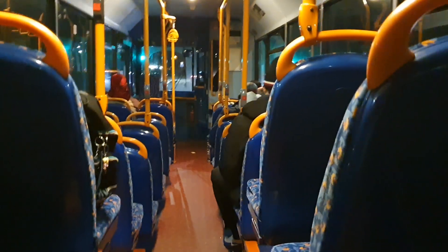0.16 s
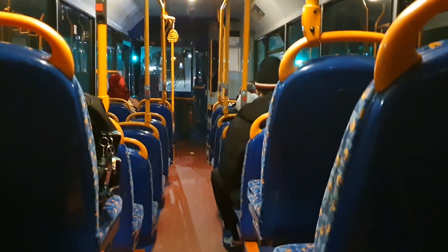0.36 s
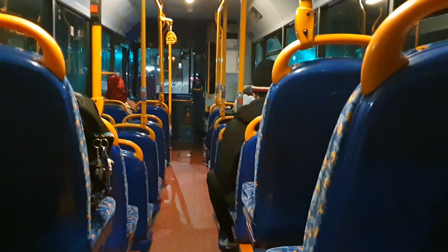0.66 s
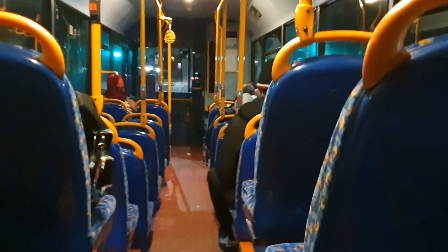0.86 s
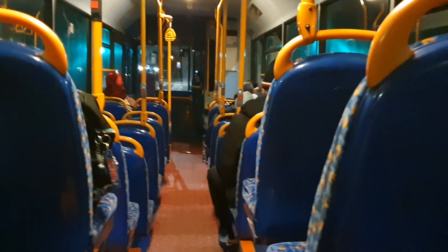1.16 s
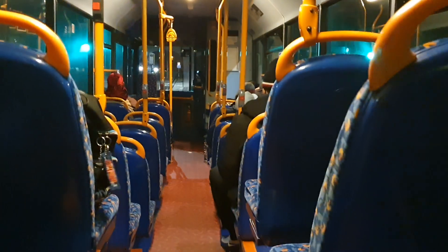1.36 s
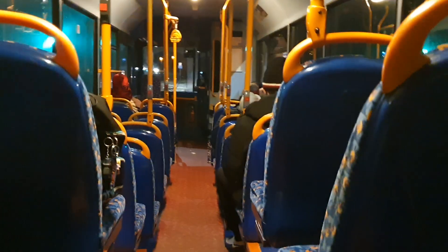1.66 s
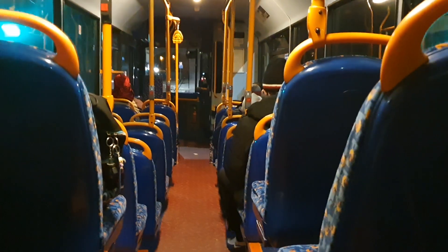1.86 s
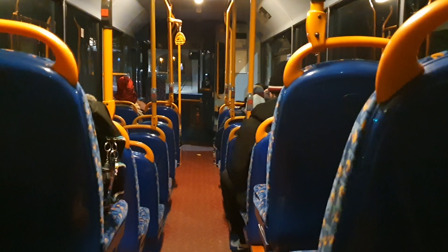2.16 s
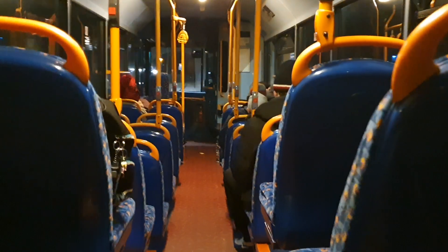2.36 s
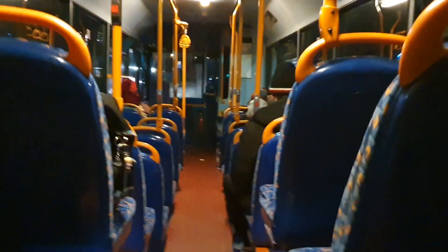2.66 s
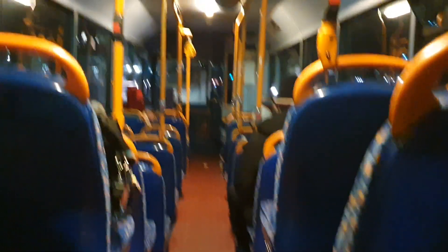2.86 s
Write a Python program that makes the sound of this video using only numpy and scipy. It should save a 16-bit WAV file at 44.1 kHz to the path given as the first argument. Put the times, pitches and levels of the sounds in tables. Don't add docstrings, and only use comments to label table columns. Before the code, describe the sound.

A bus engine drones steadily with road rumble, heard from a passenger seat; jolts bring booming knocks and panel rattles early on, a calmer middle, then more knocks and sharp window snaps.

```python
import sys
import numpy as np
from scipy import signal
from scipy.fft import rfft, irfft
from scipy.io import wavfile
from scipy.ndimage import uniform_filter1d

SR = 44100
rng = np.random.default_rng(int(sys.argv[2]) if len(sys.argv) > 2 else 0)


def materialize(psi):
    bounded = np.clip(np.atleast_2d(psi).T, -1, 1)
    quanta = np.round(bounded * 32767).astype(np.int16)
    wavfile.write(sys.argv[1], SR, quanta)


def gain_from_db(level_db):
    decades = np.asarray(level_db, float) / 20
    return 10 ** decades


N = 132300
SILENCE = 1e-18


def rms_one(x):
    return x / np.sqrt(np.mean(x ** 2) + 1e-20)


def in_time(rows):
    s, *columns = np.transpose(rows)
    return [np.interp(np.arange(N) / SR, s, c) for c in columns]


def at_hz(points, n):
    hz, value = np.transpose(points)
    grid_hz = np.arange(n // 2 + 1) * SR / n
    return np.interp(np.log(grid_hz + 1), np.log(hz + 1), value)


def colour(x, points):
    n = x.shape[-1]
    return irfft(rfft(x) * rms_one(gain_from_db(at_hz(points, n))), n)


def drift(rate_hz):
    r = np.exp(-2 * np.pi * rate_hz * 40 / SR)
    noise = rng.standard_normal(N // 40 + 2002)
    slow = signal.lfilter([1], [1, -2 * r, r * r], noise)[2000:]
    return np.interp(np.arange(N) / 40, np.arange(len(slow)), rms_one(slow))


def resonate(x, hz, width_hz):
    r = np.exp(-np.pi * width_hz / SR)
    feedback = [1, -2 * r * np.cos(2 * np.pi * hz / SR), r * r]
    return signal.lfilter(np.array([1, 0, -1]) * (1 - r * r) / 2, feedback, x)


# pitch_hz, likeness_0_to_1
LIKENESS = [(40, 0.92), (130, 0.91), (300, 0.84), (700, 0.73), (2500, 0.03)]


def pair(n):
    mid, side = rfft(rng.standard_normal((2, n)))
    alike = np.clip(at_hz(LIKENESS, n), 0, 1)
    shared = np.sqrt((1 + alike) / 2) * mid
    opposed = np.sqrt((1 - alike) / 2) * side * [[1], [-1]]
    return irfft(shared + opposed, n)


def cabin(x, t60_s, wet_db):
    tail = pair(8192) * gain_from_db(-60 * np.arange(8192) / SR / t60_s)
    tail = gain_from_db(wet_db) * tail / np.sqrt(np.sum(tail ** 2) / 2)
    return x + signal.fftconvolve(x[None], tail, axes=1)[:, :N]


def struck(n, power, length_s, t60_s, attack_s):
    rise = np.exp(-1 / (attack_s * SR))
    fast, slow = np.exp(-2 / (length_s * SR)), gain_from_db(-120 / (t60_s * SR))
    power = signal.lfilter([1 - rise], [1, -rise], power)
    chatter = signal.lfilter([1], [1, -fast], power)
    tail = gain_from_db(2 * -6) * signal.lfilter([1], [1, -slow], power)
    return pair(n) * np.sqrt(chatter + tail)


# time_s, rate_hz
FIRING_RATE = [(0, 45.19), (1.2, 46.29), (2.05, 46.36), (2.4, 48.75), (3, 46.6)]


def firing():
    hz, = in_time(FIRING_RATE)
    wobble = 1 + 0.01004 * drift(4.5)
    return 2 * np.pi * np.cumsum(hz * wobble) / SR


# time_s, level_db
ENGINE_LEVEL = [(0, -19), (.3, -22.5), (.45, -19.5), (.7, -22), (.85, -19), (1.2, -24.5), (1.45, -20.5),
                (2.05, -22), (2.33, -12.5), (2.45, -19.5), (2.65, -24), (2.8, -16), (3, -36)]
# multiple, level_db
FIRING_ORDERS = [(2, -17.5), (3, -22), (4, -20), (5, -20)]


def engine(turn):
    db, = in_time(ENGINE_LEVEL)
    out = gain_from_db(db + 2 * drift(4.0)) * np.sin(turn)
    for multiple, order_db in FIRING_ORDERS:
        level = gain_from_db(np.mean(db) + order_db + 1.6 * drift(17.0))
        out = out + level * np.sin(round(multiple) * turn + rng.uniform(0, 6.16))
    return np.sqrt(2) * out


# centre_s, level_db
LOW_SURGES = [(0.008, -15.5), (0.435, -15.5), (0.491, -13), (0.532, -17), (0.583, -10.5), (0.645, -11),
              (0.77, -21), (0.844, -19.5), (0.886, -13), (0.952, -13.5), (0.992, -17.7), (1.057, -19),
              (1.106, -14.5), (1.148, -20), (1.179, -12.5), (1.218, -15.6), (1.312, -19.5), (1.545, -22),
              (1.607, -16.5), (2.102, -15.5), (2.292, -23), (2.351, -16.8), (2.412, -18), (2.456, -30),
              (2.521, -19), (2.552, -23), (2.643, -12.5), (2.73, -12.7), (2.794, -12), (2.863, -20.5),
              (2.91, -17), (2.981, -14)]


def surges(turn):
    surge_hz, spread_s, gain_db = 69.6, 0.01, -1
    t, out = np.arange(N) / SR, np.zeros(N)
    for s, db in LOW_SURGES:
        swell = np.exp(-((t - s) / spread_s) ** 2 / 2)
        out += gain_from_db(db + gain_db) * swell * np.sin(turn[int(s * SR)] + 2 * np.pi * surge_hz * (t - s))
    return out


# pitch_hz, width_hz, level_db
BODY_BOOMS = [(30.6, 10.6, -2), (44.5, 6.1, -3), (66.46, 6.7, 3.5), (76.2, 16.3, 0.5)]


def booms(load_db):
    rings = []
    for hz, width_hz, db in BODY_BOOMS:
        ring = resonate(resonate(pair(N), hz, width_hz), hz, width_hz)
        rings.append(gain_from_db(db) * rms_one(ring))
    x = rms_one(sum(rings))
    local_power = uniform_filter1d(np.mean(x ** 2, 0), size=4000)
    return gain_from_db(load_db + 0.5) * x / np.sqrt(0.045 + local_power)


# start_s, peak_db, favoured_pitch_hz, seat_frame_brightness_db
KNOCK_EVENTS = [(.274, -16.5, 275, -10.5), (.494, -15, 164, -23), (0.543, -18, 170, -29),
                (.619, -10.5, 165, -26), (.745, -12, 298, -18), (.808, -14.5, 298, -19),
                (0.863, -7, 162, -17), (.878, -10.5, 412, -5), (.908, -12, 238, -16),
                (.945, -19.5, 180, -0.5), (.971, -18, 296, -16), (.993, -13, 220, -15),
                (1.046, -17, 195, -8), (1.077, -17, 350, -23), (1.105, -18.5, 166.4, -14),
                (1.185, -15.5, 168, -23), (1.256, -16, 248, -15), (2.067, -12.5, 232, -12.5),
                (2.146, -6, 307, -8.5), (2.448, -18, 300, 1), (2.485, -7.5, 306, -10),
                (2.553, -14.5, 332, -19), (2.616, -19, 200, -13), (2.686, -14, 189, -5.5),
                (2.716, -13.5, 317, -11), (2.759, -19, 227, -4), (2.886, -13, 277, -16),
                (2.971, -16.5, 310, -21)]
# pitch_hz, level_db, t60_s
FLOOR_MODES = [(164.8, -4.5, 0.13), (201.4, -3, 0.12), (275, -4.5, 0.12), (321, 0, 0.072),
               (375, -5.5, 0.14), (459, -9, 0.089)]


def knocks():
    s, db, pitch_hz, bright_db = np.transpose(KNOCK_EVENTS)
    at = ((s + 0.0019) * SR).astype(int)
    luck_db = rng.normal(0, 1.5, (len(s), len(FLOOR_MODES)))
    floor = 0
    for k, (hz, mode_db, t60_s) in enumerate(FLOOR_MODES):
        off_pitch_db = 9 * np.abs(np.log2(hz / pitch_hz))
        clicks = np.full(N, SILENCE)
        clicks[at] = gain_from_db(db - 3 + mode_db + luck_db[:, k] - off_pitch_db)
        r, w = gain_from_db(-60 / (t60_s * SR)), 2 * np.pi * hz / SR
        floor = floor + signal.lfilter([0, np.sin(w)], [1, -2 * r * np.cos(w), r * r], clicks)
    floor = signal.lfilter([0.13], [1, -0.87], floor)

    frame_hz, frame_width_hz = 764, 455
    power = np.full(N, SILENCE)
    power[at] = gain_from_db(2 * (db + bright_db + 9.5))
    frames = struck(N, power, length_s=0.015, t60_s=0.066, attack_s=0.0013)
    frames = resonate(resonate(frames, frame_hz, frame_width_hz), frame_hz, 2 * frame_width_hz)
    return frames + cabin(floor, t60_s=0.34, wet_db=-9)


# start_s, peak_db, pitch_hz
CLATTER_EVENTS = [(0.153, -24, 2310), (0.527, -28.5, 3220), (0.545, -18.5, 1970), (0.619, -23, 3500),
                  (0.7126, -28.5, 2700), (0.792, -21.5, 1570), (0.881, -16.5, 1700), (0.955, -17, 1890),
                  (1.017, -29, 2500), (1.1746, -24.5, 2090), (1.3867, -29, 2300), (1.5843, -28.5, 2400),
                  (1.659, -28.5, 3900), (2.027, -31.5, 2630), (2.045, -31, 2980), (2.091, -22, 1590),
                  (2.122, -27.5, 2670), (2.172, -29, 2670), (2.2256, -28.5, 2480), (2.2994, -25.5, 2480),
                  (2.4421, -22.5, 2700), (2.518, -20.5, 1570), (2.59, -31, 2690), (2.674, -20, 1540),
                  (2.752, -13, 1450), (2.807, -21.5, 1710), (2.896, -24, 2900), (2.9347, -26, 3140)]


def clatters():
    q, ping_hz, n = 1.8, 2850, 8192
    out = np.zeros((2, N + n))
    for s, db, hz in CLATTER_EVENTS:
        impulse = 1.0 * (np.arange(n) == 0)
        hit = struck(n, impulse, length_s=0.0052, t60_s=0.24, attack_s=0.0067)
        body = resonate(resonate(hit, hz, hz / q), hz, 2 * hz / q)
        wide = gain_from_db(-1) * resonate(hit, 2400, 2100)
        ping = gain_from_db(9) * (abs(hz - ping_hz) < 400) * resonate(hit, ping_hz, 140)
        out[:, int(s * SR):][:, :n] += gain_from_db(db - 10) * (4 * body + wide + ping)
    return out[:, :N]


# pitch_hz, density_db_per_hz
RATTLE_COLOUR = [(80, -42), (150, -0.5), (300, -10), (600, -16.5), (910, -13), (1300, -22.5), (4200, -26),
                 (16000, -44)]


def rattle(shake_db):
    contacts_per_s, spread_db = 400, 2
    power = gain_from_db(2 * spread_db * np.minimum(rng.exponential(1, N), 5))
    born = rng.random(N) < contacts_per_s * gain_from_db(2 * drift(14.0)) / SR
    hits = struck(N, power * born + SILENCE, length_s=0.0014, t60_s=0.096, attack_s=0.0017)
    return gain_from_db(shake_db + 10.5) * rms_one(colour(hits, RATTLE_COLOUR))


def jingle(shake_db):
    born = rng.random(N) < 900 / SR
    power = born * rng.exponential(1, N) ** 2 + SILENCE
    x = struck(N, power, length_s=0.0018, t60_s=0.19, attack_s=0.0005)
    x = signal.sosfilt(signal.butter(2, 5070, "high", fs=SR, output="sos"), x)
    return gain_from_db(-50 + 8 + 1.73 * (shake_db + 39.5)) * rms_one(x)


# start_s, peak_db, dull_body_db
WINDOW_TICKS = [(0.0159, -46, -2), (0.0857, -42, -2), (0.1575, -39, -1), (0.217, -38.5, -7),
                (0.2902, -45, -3), (0.3491, -45, -1), (0.426, -36.5, -1), (0.5292, -41.5, 13),
                (0.6125, -37, 9.5), (0.7138, -37.5, 9.5), (0.794, -36, 8.5), (0.8764, -34.5, 6),
                (0.9308, -31, -11), (1.0809, -41, -15), (1.1228, -37, -5), (1.2052, -45, -13),
                (1.281, -43, -3), (1.3504, -45.5, 2), (1.4032, -48, -7), (1.4147, -49, 0),
                (1.4819, -43, -0.5), (1.5489, -49, -1), (1.6147, -51, 10), (1.7025, -48, -4),
                (1.7619, -54, -10), (1.8128, -60, 10), (1.9175, -53, 13), (2.0258, -50, -1),
                (2.0433, -39, -1), (2.0956, -53, -3), (2.1221, -48, 9), (2.1485, -34, -4),
                (2.2353, -41.5, -9), (2.3062, -37.5, -17), (2.3645, -45, -6), (2.4423, -33.5, 4),
                (2.4877, -32, -13), (2.5546, -37, -13), (2.5765, -35, -5), (2.6484, -36, -4),
                (2.6738, -35, -4), (2.7362, -37, -8), (2.855, -36, -6), (2.917, -52, 1), (2.9831, -38, -9)]
# pitch_hz, density_db_per_hz
GLASS_COLOUR = [(5000, -14), (8000, -1), (10500, -1.5), (13500, 6.5), (16000, 4)]


def window():
    s, db, body_db = np.transpose(WINDOW_TICKS)
    at, tick_db = (s * SR).astype(int), db - 8.5
    power = np.full((2, N), SILENCE)
    power[0, at] = gain_from_db(2 * tick_db)
    power[1, at] = gain_from_db(2 * (tick_db + body_db - 1))
    glass, body = (struck(N, p, length_s=0.0053, t60_s=0.19, attack_s=0.0025) for p in power)
    return 4 * (colour(glass, GLASS_COLOUR) + resonate(body, 5500, 4000))


# start_s, peak_db, pitch_hz
GLASS_CRACKS = [
    (.7946, -36, 12000),
    (.8764, -34, 9000),
    (1.1228, -32, 10970),
    (1.8128, -49, 4500),
    (1.9175, -43.5, 4500),
    (2.1221, -37, 9000),
    (2.1485, -27.5, 11000),
    (2.4877, -18.5, 11100),
    (2.5546, -24.5, 12000),
]


def cracks():
    out, t = np.zeros(N + 1024), np.arange(1024) / SR
    for s, db, hz in GLASS_CRACKS:
        chatter = 0.12 * rng.standard_normal(1024) * np.exp(-t / 0.0016)
        bounce = gain_from_db(-3) * (np.arange(1024) == int(0.0035 * SR))
        snap = chatter + (t == 0) + bounce
        out[int(s * SR):][:1024] += gain_from_db(db + 17) * resonate(snap, hz, 8300)
    return out[:N]


# start_s, length_s, pitch_hz, level_db
POLE_HUMS = [
    (2.227, 0.095, 653, -37.5),
    (2.491, 0.044, 660, -36.5),
    (2.651, 0.097, 899, -28),
    (2.653, 0.035, 668, -36),
    (2.736, 0.063, 498, -32.5),
    (1.169, 0.048, 488, -31.5),
]


def poles():
    t = np.arange(N) / SR
    rough = gain_from_db(1.5 * drift(35.0))
    wandering_t = np.cumsum(1 + 0.003 * drift(19.0)) / SR
    hums = np.zeros(N)
    for s, length_s, hz, db in POLE_HUMS:
        swell = np.abs(np.sin(np.pi * np.clip((t - s) / length_s, 0, 1))) ** 0.67
        hums += gain_from_db(db) * swell * np.sin(2 * np.pi * hz * wandering_t)
    return cabin(rough * hums, t60_s=0.025, wet_db=-0.5)


# pitch_hz, density_db_per_hz
ROAD_COLOUR = [(70, -9), (110, -8), (240, -7.5), (415, -16), (1390, -29), (4000, -41.5), (7000, -70.5),
               (16000, -80)]


def road(shake_db):
    level_db = -32 + 0.36 * (shake_db - shake_db.min()) + 1.2 * drift(24.0)
    return gain_from_db(level_db) * colour(pair(N), ROAD_COLOUR)


# time_s, rattle_db, road_load_db
BODY_SHAKE = [(0, -48.5, -25.5), (.3, -50, -33.5), (.48, -45.5, -21), (.57, -39, -15.5),
              (.72, -43.5, -31.5), (.85, -39.5, -14), (.97, -35.5, -27), (1.15, -43.5, -21.5),
              (1.35, -52, -31), (1.85, -55, -27.5), (2.01, -51, -28), (2.06, -44.5, -17.5),
              (2.17, -44.5, -24.5), (2.36, -48, -25), (2.47, -38.5, -17), (2.7, -40.5, -23.5),
              (2.9, -41, -22), (3, -45.5, -28)]


def scene():
    shake_db, load_db = in_time(BODY_SHAKE)
    turn = firing()
    low = engine(turn) + surges(turn) + booms(load_db) + road(shake_db)
    loose = rattle(shake_db) + jingle(shake_db) + cracks() + window() + clatters()
    return low + loose + knocks() + poles()


def low_pass(x):
    return signal.sosfilt(signal.butter(12, 16500, fs=SR, output="sos"), x)


# pitch_hz, lean_db
LEFT_LEAN = [(60, 1), (300, 1), (700, 2.5), (2000, 5), (5000, 6), (8500, 3.5), (14000, 3)]


def record(dry):
    overload = 0.95
    rounded = overload * np.tanh(dry / overload)
    hz = np.arange(N // 2 + 1) * SR / N
    shelf_db = -6 / (1 + np.exp(-(hz - 7020) / 74.0))
    cut_db = -50 * (hz > 15950)
    lean_db = at_hz(LEFT_LEAN, N) / 2 * [[1], [-1]]
    left, right = irfft(rfft(rounded) * gain_from_db(shelf_db + cut_db + lean_db), N)
    return low_pass(np.array([np.roll(left, 13), right]))


dry = scene()
out = record(dry)
materialize(out)
```